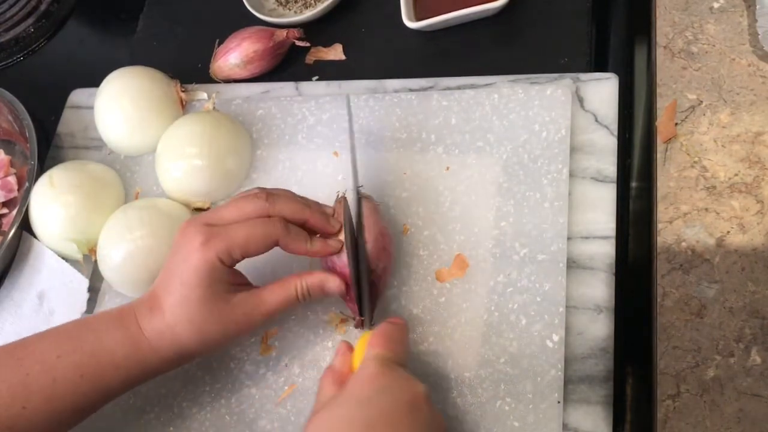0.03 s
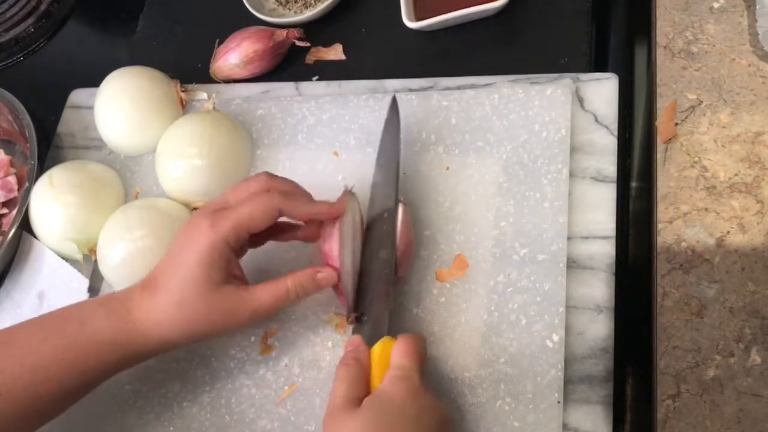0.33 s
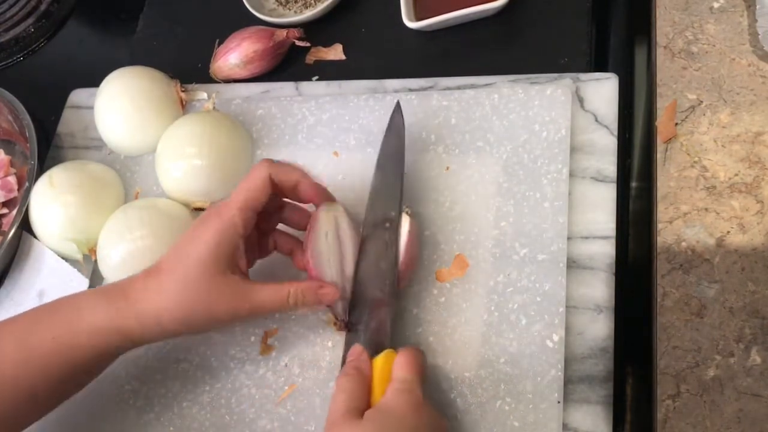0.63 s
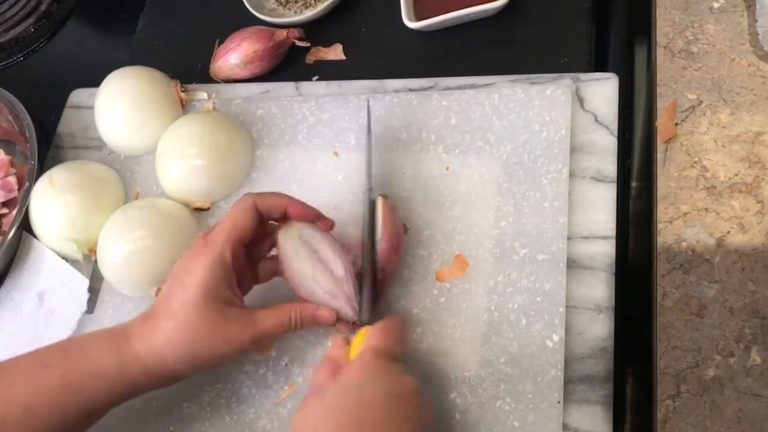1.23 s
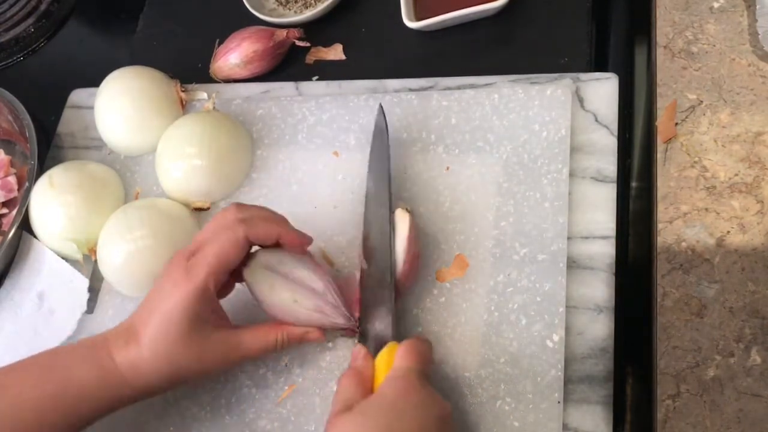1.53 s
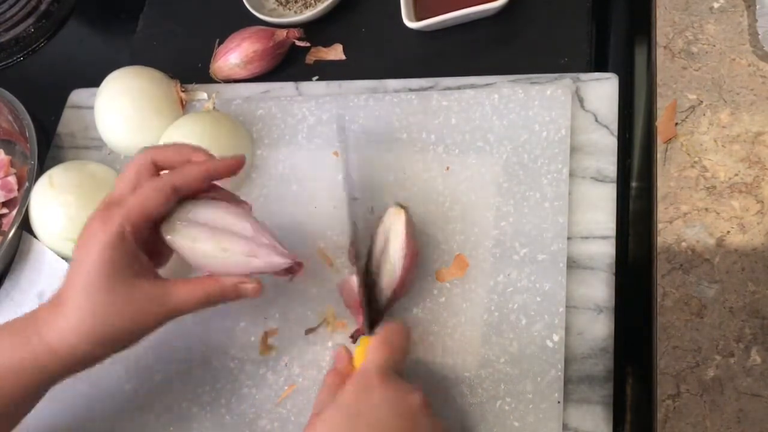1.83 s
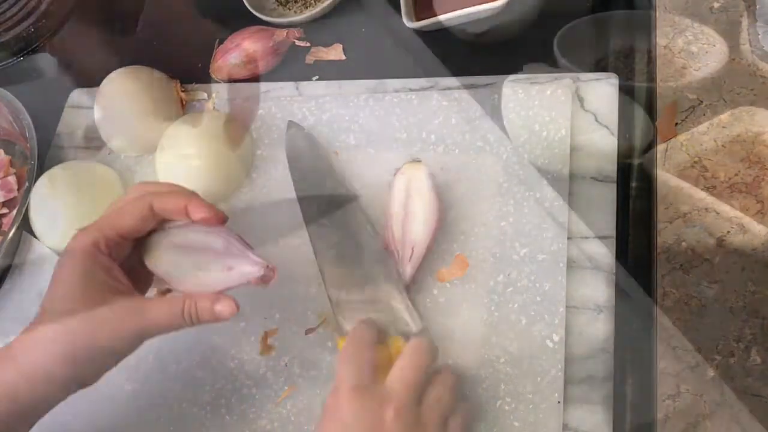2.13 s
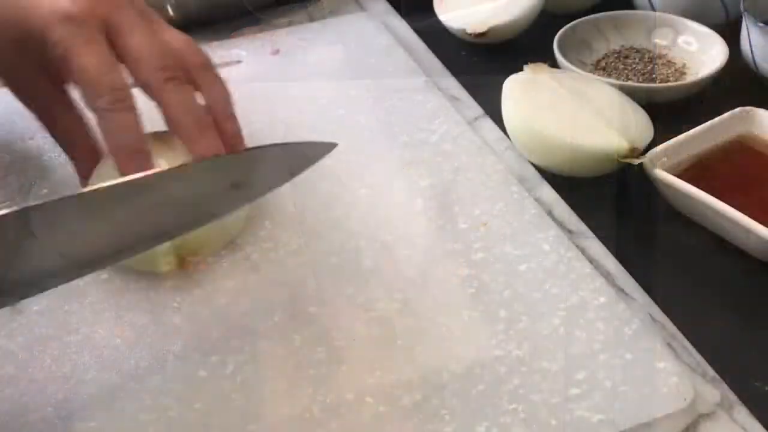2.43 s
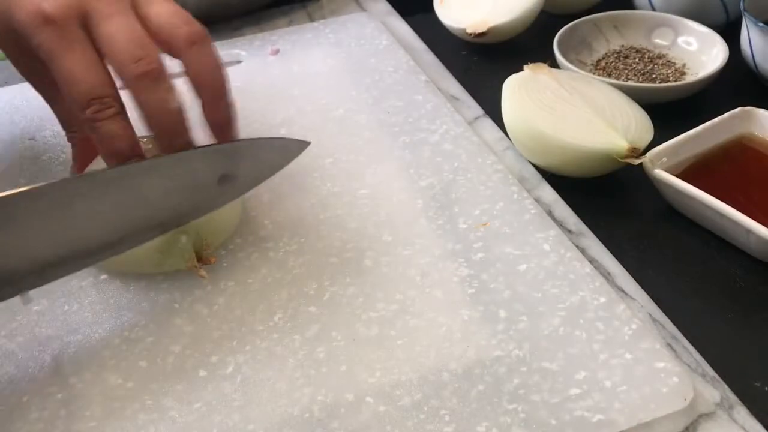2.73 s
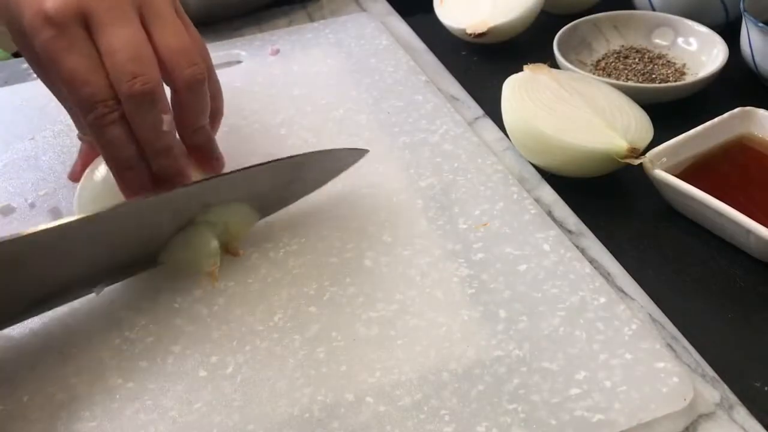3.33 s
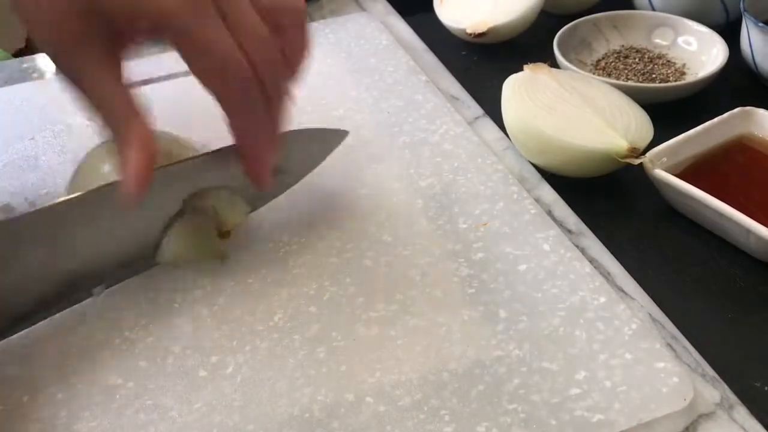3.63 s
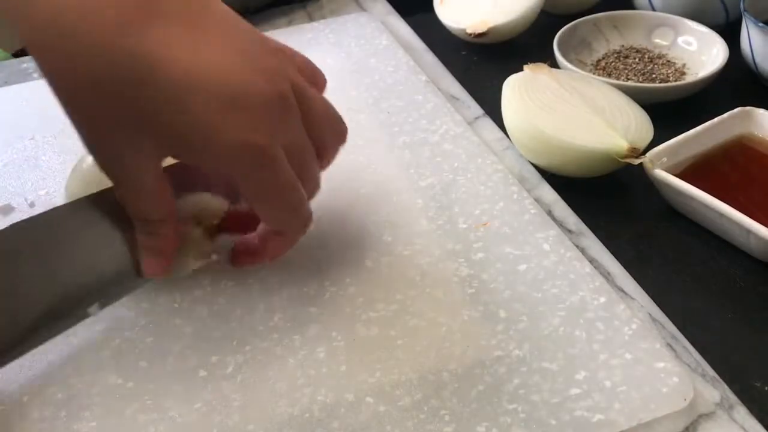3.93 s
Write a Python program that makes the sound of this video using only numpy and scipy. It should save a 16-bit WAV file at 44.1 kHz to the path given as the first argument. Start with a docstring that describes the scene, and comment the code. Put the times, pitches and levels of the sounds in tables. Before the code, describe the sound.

Close-up knife cutting in a quiet kitchen with a faint appliance hum: papery shallot skin crackles and tears, the blade taps and scrapes a plastic board, then an onion is sliced with a juicy crunch and one hard chop.

```python
"""A shallot's dry skin snaps, crackles and tears as a kitchen knife works the halved bulb free.
The blade bites into the flesh, knocks, scrapes and skids on a plastic board, then crunches
through an onion's juicy cells and lands hard. Fingers gather the pieces with a moist rustle.
Heard close up in a small, quiet kitchen with a humming appliance."""
import sys
import numpy as np
from scipy import signal
from scipy.fft import rfft, irfft
from scipy.io import wavfile
from scipy.ndimage import uniform_filter1d

SR = 44100
rng = np.random.default_rng(int(sys.argv[2]) if len(sys.argv) > 2 else 0)


def store_wav(level_fs):
    """Save 16-bit WAV to argv[1]."""
    pcm = np.round(np.clip(np.atleast_2d(level_fs), -1, 1) * 32767)
    wavfile.write(sys.argv[1], SR, pcm.T.astype(np.int16))


N = 176400
LEVEL_WINDOW_S, TOP_HZ = .0015, 15950


def amp(db):
    """Decibels to gain."""
    return 10 ** (np.asarray(db, float) / 20)


def unit(x):
    """Scale to rms 1."""
    return x / np.sqrt(np.mean(x ** 2))


def conv(x, response):
    """Pass a sound through a response, keeping its length."""
    return signal.fftconvolve(x, response)[:len(x)]


def colour(x, points, size=1024):
    """Minimum-phase EQ through (freq_hz, gain_db) points; white noise keeps its power."""
    hz, db = np.array(points, float).T
    bins_hz = np.fft.rfftfreq(size, 1 / SR)
    gain = unit(amp(np.interp(np.log(bins_hz + 1), np.log(hz), db)))
    cepstrum = irfft(np.log(gain))
    cepstrum[1:size // 2] *= 2
    cepstrum[size // 2 + 1:] = 0
    return conv(x, irfft(np.exp(rfft(cepstrum))))


def add(out, start_s, x):
    """Mix a short sound in at a time."""
    i = int(start_s * SR)
    out[i:i + len(x)] += x[:N - i]


def burst(envelope, points):
    """Enveloped, coloured noise with the energy of rms 1 held for LEVEL_WINDOW_S."""
    x = colour(rng.standard_normal(len(envelope)) * envelope, points)
    return x * np.sqrt(LEVEL_WINDOW_S * SR / np.sum(x ** 2))


def clicks(per_s, scatter_db=6):
    """Randomly timed clicks of scattered size, rms 1."""
    sizes = amp(scatter_db * np.clip(rng.standard_normal(N), -2, 2)) * rng.choice([-1, 1], N)
    return unit((rng.random(N) < per_s / SR) * sizes)


def fader(points):
    """Gain ride through (time_s, level_db) points, silent outside them."""
    return amp(np.interp(np.arange(N) / SR, *np.array(points).T, left=-np.inf, right=-np.inf))


# How hard the skin is rubbed and torn: time_s, level_db
PEEL_RIDE = [(0, -44.5), (.07, -64), (.15, -66), (.18, -44.5), (.228, -33), (.30, -52), (.36, -49),
             (.42, -52.5), (.46, -43), (.55, -53), (.60, -51.5), (.755, -64.5), (.782, -36), (.82, -36.5),
             (.86, -48.5), (.885, -43), (.945, -50), (.97, -48), (1.03, -37.5), (1.07, -45.5), (1.092, -28),
             (1.155, -57), (1.175, -50), (1.24, -44.5), (1.262, -30), (1.285, -37), (1.322, -25.5),
             (1.348, -39), (1.372, -32.5), (1.40, -46.5), (1.50, -61.5), (1.60, -53.5), (1.618, -32),
             (1.68, -64.5), (1.98, -61), (2.045, -58), (2.072, -42.5), (2.095, -89)]
# Single snaps, each with its share of hollow body: start_s, level_db, body_db
SKIN_SNAPS = [(0.017, -36, -7), (0.0467, -32, -12), (.061, -37.5, 10), (0.171, -19.5, -13),
              (0.1754, -32, -63.5), (0.201, -24, -15), (0.2161, -26, 4.5), (0.2207, -14, -4.5),
              (0.2375, -35, -12.5), (0.28, -29, -2.5), (0.3279, -24.5, 3), (.345, -24, -5.5),
              (0.3836, -30, -5), (0.437, -25, -5.5), (0.4522, -35.5, 4.5), (0.4673, -31, 10.5),
              (0.478, -36, 5), (0.4888, -35, 3), (0.5138, -28.5, -3.5), (0.5658, -29, -37),
              (0.5913, -47, -6), (0.6008, -26, -27), (0.6446, -35, -3), (0.7857, -28.5, -38),
              (0.8079, -33, 3.5), (0.874, -35, 0), (0.955, -27, -54), (0.9596, -52, 18), (0.965, -23.5, -6),
              (0.981, -53, 9), (0.993, -33, -3), (1.0097, -26, -7.5), (1.083, -18, -24), (1.102, -19, -21),
              (1.136, -28, 3.5), (1.1486, -19.5, -3.5), (1.185, -26, -28), (1.2105, -28, -2),
              (1.2248, -14, -42), (1.2544, -22.5, -87), (1.2922, -22, -33), (1.312, -18.5, -30.5),
              (1.324, -19.5, -44), (1.3296, -19.5, -11), (1.354, -26.5, -7), (1.414, -24, -25),
              (1.4298, -32.5, -12), (1.564, -40.5, -20), (1.614, -20, -13), (1.6163, -31, -15),
              (1.9098, -34.5, -18.5), (2.056, -51, 11), (3.2193, -17.5, -6), (3.4312, -39.5, -36)]
# Papery tone of the skin: freq_hz, gain_db
SKIN_EQ = [(200, -36), (600, -17), (1300, -4), (2000, -2.5), (3200, 3.5), (4500, -0.5), (6500, 3.5),
           (8500, -1.5), (15500, 1)]
# Bright tone of a breaking fibre: freq_hz, gain_db
FIBRE_EQ = [(800, -18.5), (3000, -6), (8300, 3), (10500, -3), (14500, 4)]
# Hollow tone of the bulb underneath: freq_hz, gain_db
BULB_EQ = [(200, -9.5), (550, -17), (1450, -2), (2100, -9), (3100, 7), (4300, -5.5), (9000, -6.5)]


def dry_skin(snap_s=0.00058, ring_s=0.0043, body_s=0.0012):
    """Skin crackles and fibres tick as they tear; each snap rings a flake and sounds the bulb."""
    crackle = colour(clicks(per_s=2200), SKIN_EQ)
    fibres = colour(clicks(per_s=150), FIBRE_EQ)
    out = unit(crackle + amp(-2.5) * fibres) * fader(PEEL_RIDE)
    t = np.arange(SR // 20) / SR
    envelope = np.exp(-t / snap_s) + amp(-13) * np.exp(-t / ring_s)
    for start_s, level_db, body_db in SKIN_SNAPS:
        crack = burst(envelope, FIBRE_EQ)
        # The less body a snap has, the smaller and higher its flake.
        flake_hz = np.clip(7150 - 341 * body_db, TOP_HZ / 10, TOP_HZ)
        flake = signal.lfilter(*signal.iirpeak(flake_hz, Q=4.3, fs=SR), crack)
        snap = unit(crack + amp(-5) * flake) * np.std(crack)
        detuned_eq = np.array(BULB_EQ) * [rng.uniform(.87, 1.15), 1]
        body = amp(body_db) * burst(np.exp(-t / body_s), detuned_eq)
        add(out, start_s, amp(level_db - 0.5) * (snap + body))
    return out


# Partials of the motor hum: pitch_hz, level_db
MOTOR_PARTIALS = [(59.3, -56.5), (97, -68.5), (146, -65), (294.5, -58.5)]
# Dark room tone: freq_hz, gain_db
AIR_EQ = [(25, -46.5), (42, -9.5), (58, -22), (78, -15), (160, -13), (205, -11.5), (290, -6), (360, -14),
          (450, -18), (830, -24.5), (5700, -43), (15800, -48)]


def appliance(top_waver_hz=2.38):
    """A slightly wavering motor hum over soft room air."""
    out = amp(-55) * unit(colour(rng.standard_normal(N), AIR_EQ, size=8192))
    for pitch_hz, level_db in MOTOR_PARTIALS:
        wander = unit(uniform_filter1d(rng.standard_normal(N), SR // 10))
        drift_hz = wander * top_waver_hz * pitch_hz / MOTOR_PARTIALS[-1][0]
        phase = 2 * np.pi * np.cumsum(pitch_hz + drift_hz) / SR
        out += amp(level_db) * np.sqrt(2) * np.sin(phase)
    return out


# Crunch of the bite into the shallot: time_s, level_db
SHALLOT_RIDE = [(1.075, -37), (1.098, -31), (1.15, -37.5), (1.21, -45)]
# Crunch of the cut through the onion: time_s, level_db
ONION_RIDE = [(3.085, -71), (3.106, -48), (3.129, -39.5), (3.137, -53), (3.16, -40), (3.19, -34),
              (3.232, -26.5), (3.242, -43), (3.30, -48), (3.335, -65)]
# Wet tone of the flesh: freq_hz, gain_db
FLESH_EQ = [(200, -21), (600, -7), (1150, 0.5), (2500, -5.5), (4200, -4), (6300, 1), (8000, -6),
            (10500, -7.5), (13000, -3.5), (15500, -8)]


def slicing():
    """Juicy cells burst in a dense crunch as the blade sinks into the shallot, later the onion."""
    cells = colour(clicks(per_s=8300, scatter_db=8.5), FLESH_EQ)
    return cells * (fader(SHALLOT_RIDE) + fader(ONION_RIDE))


# Knife hits, the hard chop rebounding twice: start_s, level_db, contact_ms, tick_db, ring_db
KNIFE_HITS = [(1.3776, -19, 0.66, -39, 8), (1.997, -16.5, 0.25, -1, 1.5), (2.1352, -12, 0.035, -33.5, -11),
              (3.2354, -2.5, 0.088, -20, -2), (3.2384, -6.5, 0.24, -22, -2.5),
              (3.2423, -8.5, 0.11, -25.5, -5.5), (3.712, -37.5, 0.27, -15.5, 4.5),
              (3.7243, -41, 0.18, -9, 11), (3.7286, -26.5, 0.27, -19, -7), (3.7467, -18.5, 0.41, -19, -1.5)]
# Modes of the plastic board: pitch_hz, level_db, t60_s
BOARD_MODES = [(167.6, -12.5, 0.28), (334, -22.5, 0.24), (680, -5, 0.057), (775, -6, 0.022),
               (971, -2.5, 0.06), (1063, -2.5, 0.045), (1310, -7.5, .035), (1490, -8, 0.028),
               (1728, -8.5, .035)]
# Tone of the board's slap and dense ring: freq_hz, gain_db
BOARD_EQ = [(150, -25.5), (500, -9.5), (820, -1), (1600, -0.5), (2300, -6.5), (4000, -11), (5500, -22),
            (15000, -73.5)]
# Tone of steel on plastic, for the edge tick and the skid: freq_hz, gain_db
CONTACT_EQ = [(70, -36), (150, 11.5), (650, -5.5), (2500, -6.5), (6000, -8.5), (9500, -8.5), (10600, -12.5),
              (12000, -7.5), (15500, -9.5)]
TICK_DECAY_S = 0.00076


def board_knocks(edge_hz=2790, edge_s=0.0014, ring_s=0.0052, low_cut_hz=165):
    """Each blow slaps and rings the board, while the hard edge ticks and rings the blade."""
    out = np.zeros(N)
    t = np.arange(SR // 2) / SR
    slap = amp(-6.5) * np.sqrt(LEVEL_WINDOW_S * SR) * colour(signal.unit_impulse(len(t)), BOARD_EQ)
    edge = np.sin(2 * np.pi * edge_hz * t) * np.exp(-t / edge_s)
    for start_s, level_db, contact_ms, tick_db, ring_db in KNIFE_HITS:
        detunes = rng.uniform(.98, 1.02, len(BOARD_MODES))  # each spot rings differently
        modes = np.zeros(len(t))
        for (pitch_hz, mode_db, t60_s), detune in zip(BOARD_MODES, detunes):
            decay = np.exp(-np.log(1000) * t / t60_s)
            modes += amp(mode_db - 10.5) * np.sin(2 * np.pi * pitch_hz * detune * t) * decay
        dense_ring = amp(-0.5) * burst(np.sqrt(t) * np.exp(-t / ring_s), BOARD_EQ)
        push = np.exp(-t * 1000 / contact_ms)  # longer contact dulls the knock
        knock = conv(slap + amp(ring_db) * (modes + dense_ring), push / push.sum())
        tick = amp(tick_db - 1) * (burst(np.exp(-t / TICK_DECAY_S), CONTACT_EQ) + edge)
        add(out, start_s, amp(level_db) * (knock + tick))
    return signal.sosfilt(signal.butter(4, low_cut_hz, "high", fs=SR, output="sos"), out)


# Fingers and blade rubbing the moist onion: time_s, level_db
RUSTLE_RIDE = [(1.66, -74), (1.82, -67), (1.9, -56.5), (2.1, -59.5), (2.38, -72.5), (2.44, -59),
               (2.52, -77), (3.05, -75.5), (3.49, -64), (3.62, -72), (4.0, -69.5)]
# Light handling ticks: start_s, level_db
HANDLING_TICKS = [(1.59, -43), (1.769, -46.5), (1.8241, -51.5), (3.4598, -48), (3.492, -50), (3.876, -52)]


def handling():
    """A faint moist rustle under the fingers, with a few crisp ticks."""
    out = colour(clicks(per_s=500, scatter_db=4.5), FLESH_EQ) * fader(RUSTLE_RIDE)
    t = np.arange(SR // 20) / SR
    for start_s, level_db in HANDLING_TICKS:
        add(out, start_s, amp(level_db) * burst(np.exp(-t / TICK_DECAY_S), SKIN_EQ))
    return out


# The edge dragging on the board: time_s, level_db
SCRAPE_RIDE = [(2.005, -51), (2.055, -51), (2.075, -51), (2.086, -65)]


def edge_scrape(band_hz=(1400, 3100)):
    """The edge catches on the grain of the board in many tiny slips."""
    band = signal.butter(2, band_hz, "band", fs=SR, output="sos")
    slips = signal.sosfilt(band, clicks(per_s=2200))
    return unit(slips) * fader(SCRAPE_RIDE)


# Resonances of the steel blade: pitch_hz, width_hz, gain_db
BLADE_RESONANCES = [(1400, 420, 1.2), (5200, 1000, 2.2), (6200, 340, 4.8), (7130, 200, 15.2),
                    (8274, 100, 9.2), (2760, 310, 2.8)]


def blade_skid(start_s=2.1405, rise_s=0.0028, hold_s=0.01, fall_s=0.0096):
    """The flat of the blade rubs briefly over the textured board and sings in its resonances."""
    t = np.arange(N) / SR - start_s
    attack = np.clip(t / rise_s, 0, 1)
    release = np.exp(-np.maximum(t - rise_s - hold_s, 0) / fall_s)
    rub = rng.standard_normal(N)
    steel = sum(amp(gain_db) * signal.lfilter(*signal.iirpeak(pitch_hz, pitch_hz / width_hz, SR), rub)
                for pitch_hz, width_hz, gain_db in BLADE_RESONANCES)
    return amp(-24.5) * attack * release * unit(colour(rub, CONTACT_EQ) + amp(0.5) * steel)


def reflections(decay_s, onset_s):
    """A swelling, then dying wash of echoes with unit energy."""
    t = np.arange(SR // 2) / SR
    swell = 1 - np.exp(-(t / onset_s) ** 2)
    echoes = rng.standard_normal(len(t)) * np.exp(-t / decay_s) * swell
    return echoes / np.sqrt(np.sum(echoes ** 2))


def kitchen(x, low_t60_s=0.41, high_t60_s=0.3):
    """Quick reflections from the worktop, then a short room tail that is briefer in the treble."""
    lowpass = signal.butter(4, 3300, fs=SR, output="sos")
    highpass = signal.butter(2, 3000, "high", fs=SR, output="sos")
    low_tail = signal.sosfilt(lowpass, reflections(low_t60_s / np.log(1000), onset_s=0.008))
    high_tail = signal.sosfilt(highpass, reflections(high_t60_s / np.log(1000), onset_s=0.011))
    worktop = reflections(decay_s=0.01, onset_s=0.00033)
    return x + conv(x, amp(-5) * worktop + amp(-13) * low_tail + amp(-21) * high_tail)


def scene():
    """The knife work in the kitchen's reverb, over the hum, in mono."""
    foley = dry_skin() + board_knocks() + blade_skid() + edge_scrape() + slicing() + handling()
    return (kitchen(foley) + appliance())[None]


def record(dry):
    """Hard-limit at full scale, then cut the top steeply."""
    high_cut = signal.ellip(10, .2, 70, TOP_HZ, fs=SR, output="sos")
    return signal.sosfilt(high_cut, np.clip(dry, -1, 1))


dry = scene()
out = record(dry)
store_wav(out)
```